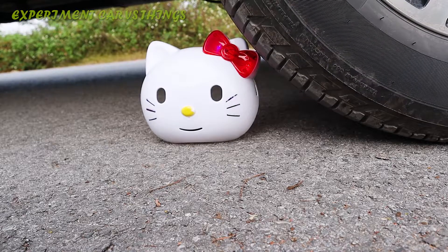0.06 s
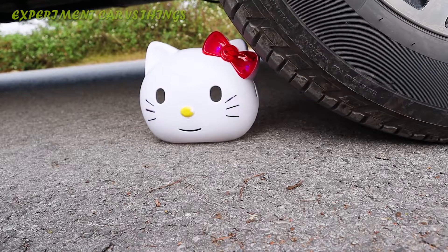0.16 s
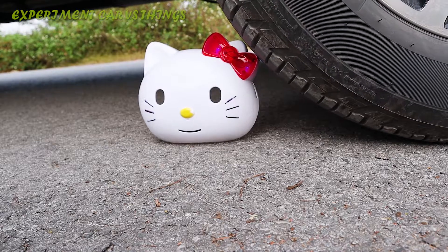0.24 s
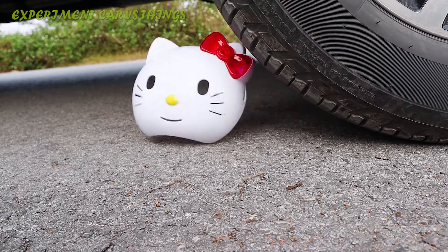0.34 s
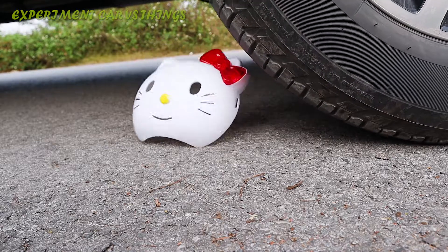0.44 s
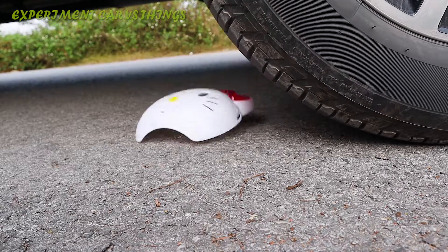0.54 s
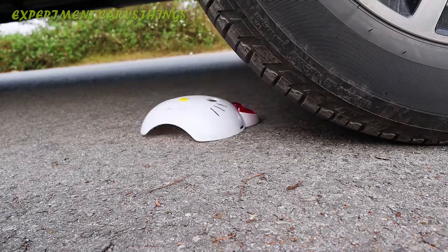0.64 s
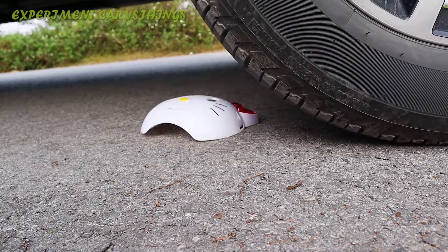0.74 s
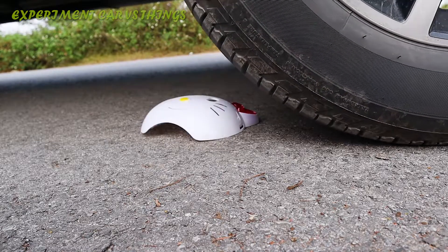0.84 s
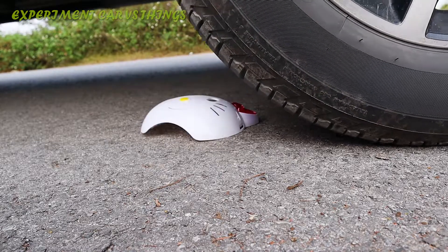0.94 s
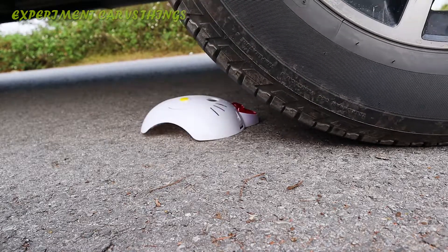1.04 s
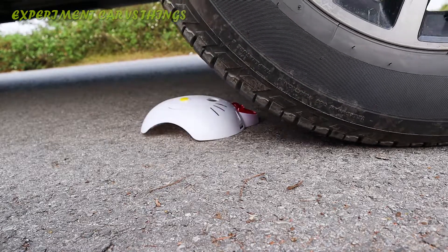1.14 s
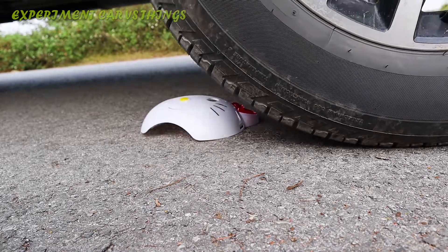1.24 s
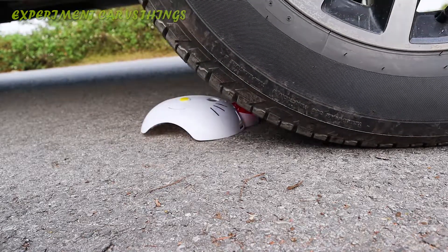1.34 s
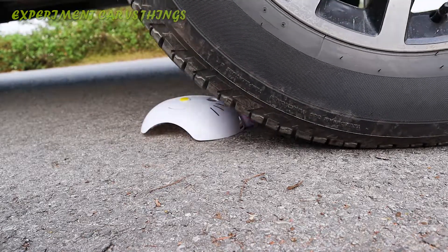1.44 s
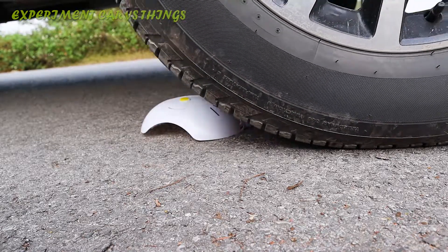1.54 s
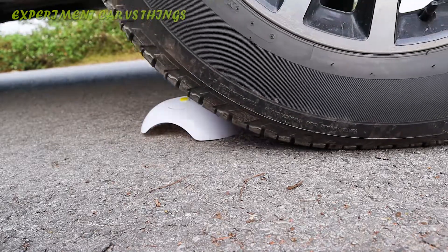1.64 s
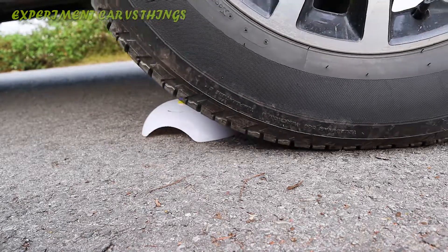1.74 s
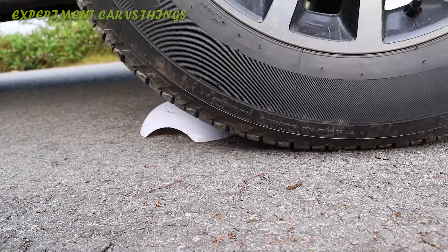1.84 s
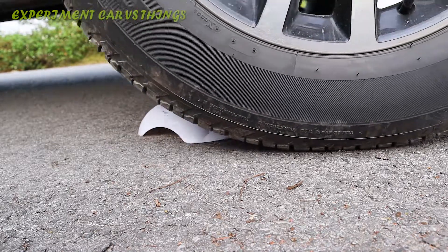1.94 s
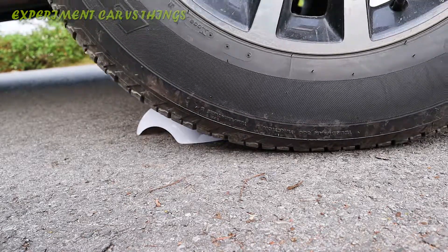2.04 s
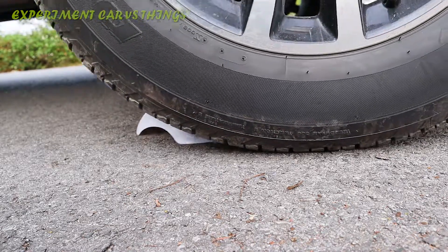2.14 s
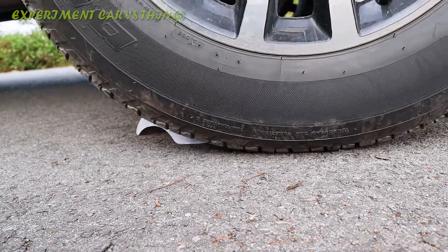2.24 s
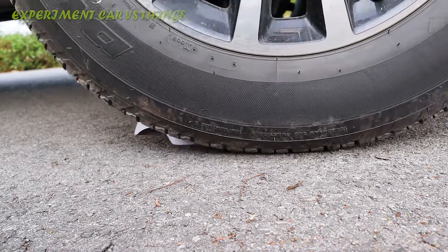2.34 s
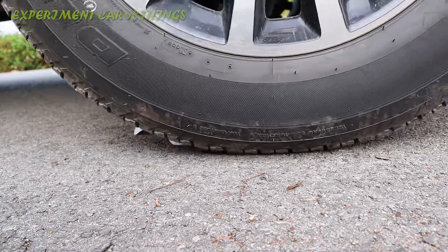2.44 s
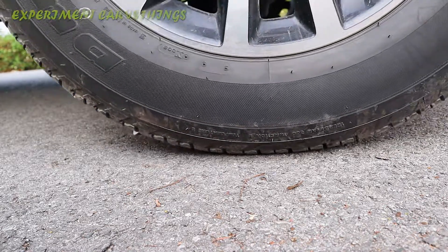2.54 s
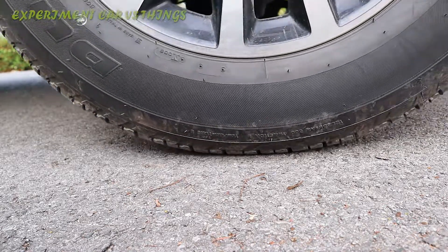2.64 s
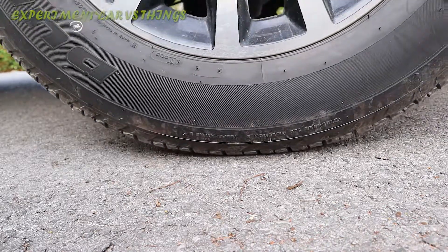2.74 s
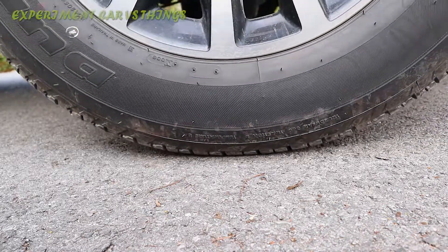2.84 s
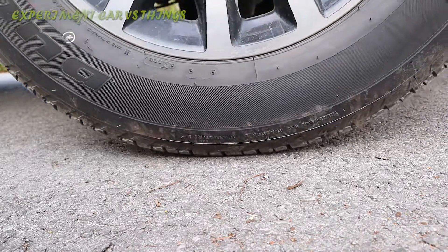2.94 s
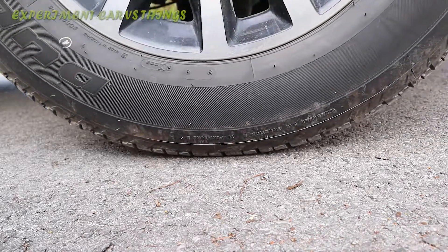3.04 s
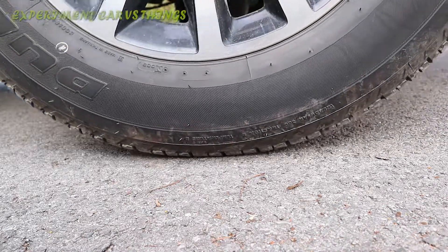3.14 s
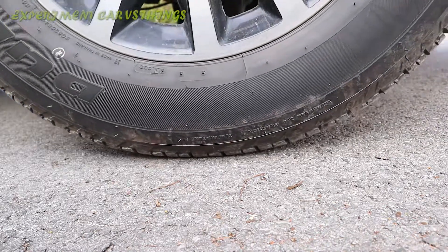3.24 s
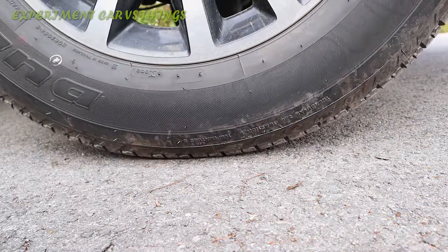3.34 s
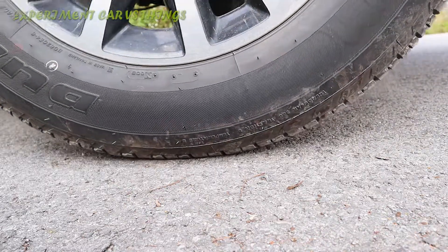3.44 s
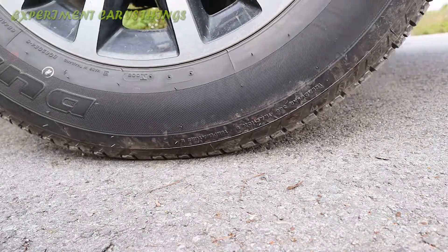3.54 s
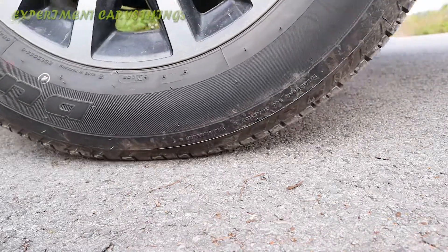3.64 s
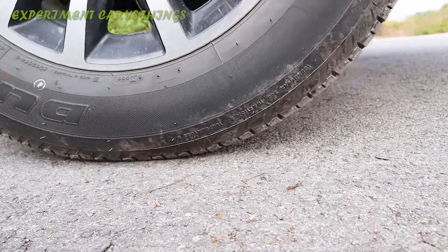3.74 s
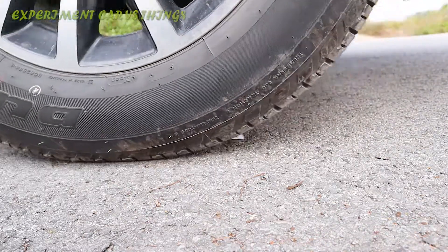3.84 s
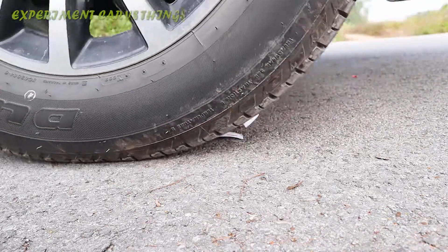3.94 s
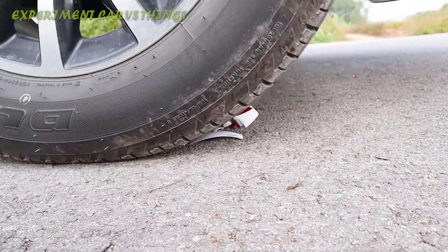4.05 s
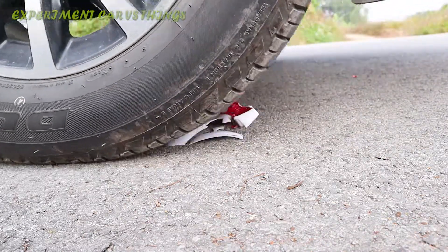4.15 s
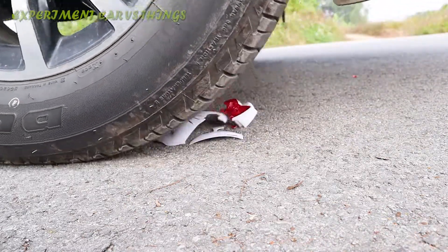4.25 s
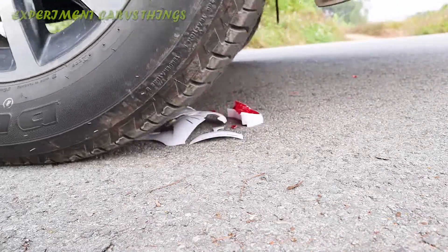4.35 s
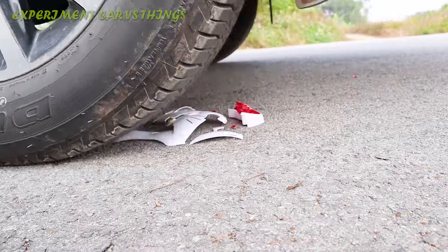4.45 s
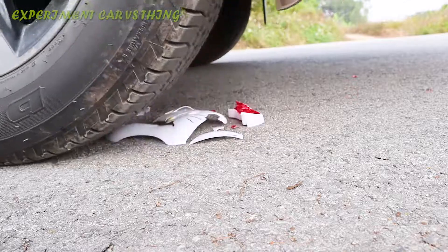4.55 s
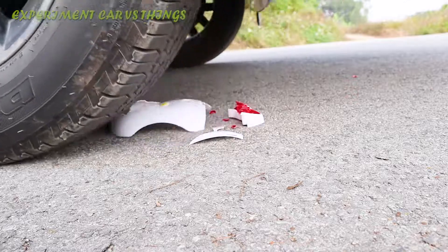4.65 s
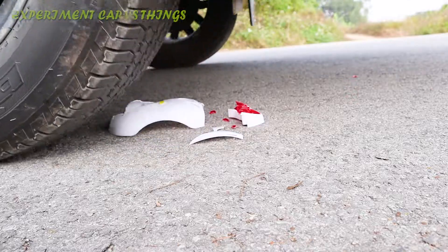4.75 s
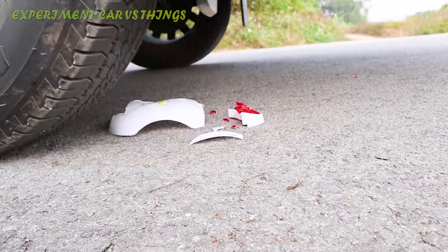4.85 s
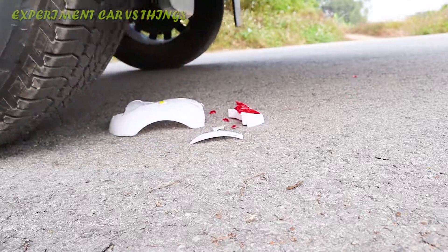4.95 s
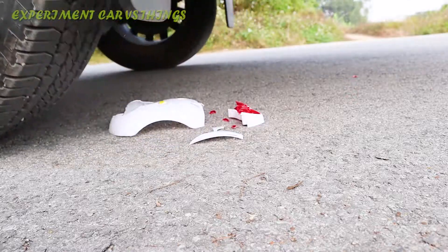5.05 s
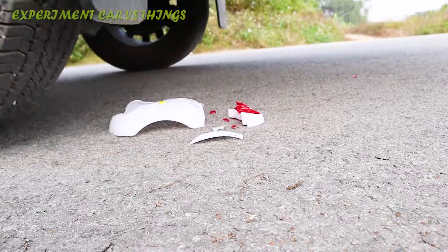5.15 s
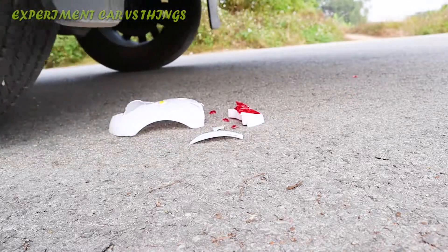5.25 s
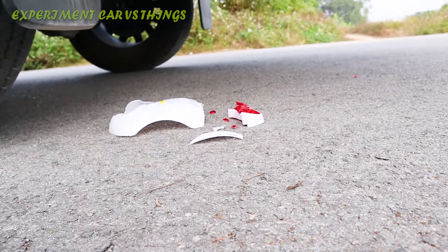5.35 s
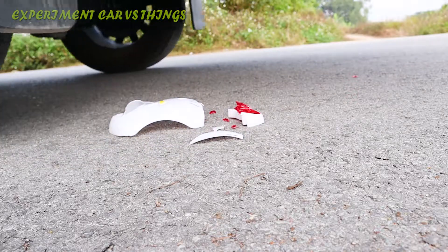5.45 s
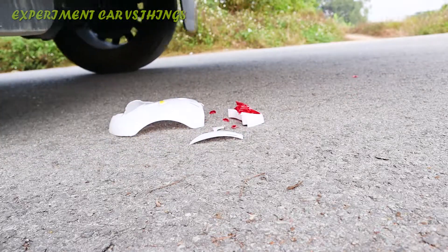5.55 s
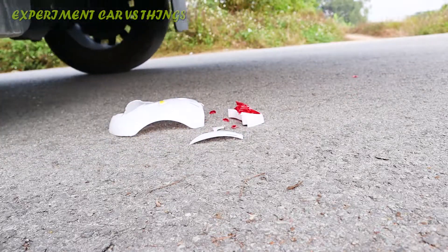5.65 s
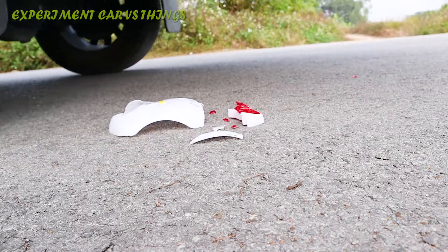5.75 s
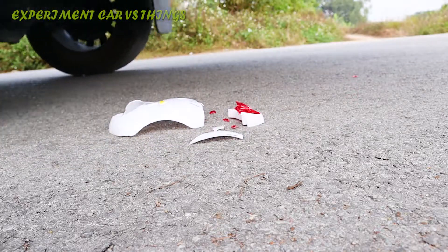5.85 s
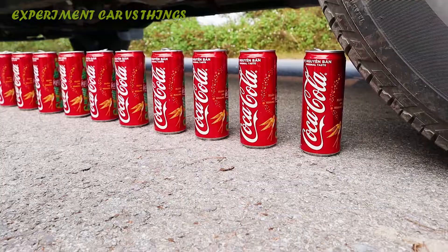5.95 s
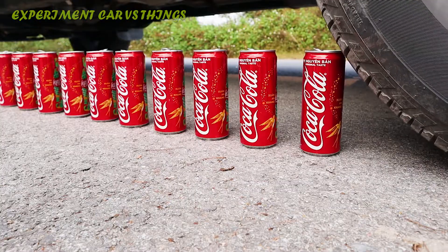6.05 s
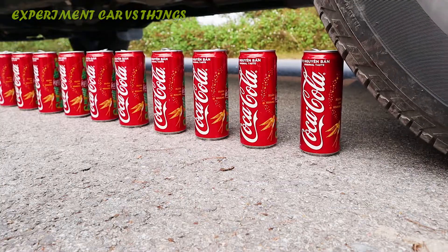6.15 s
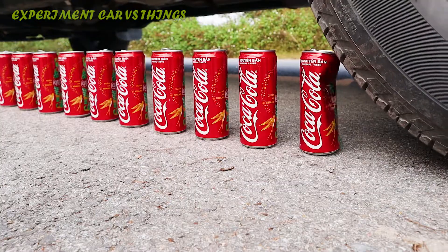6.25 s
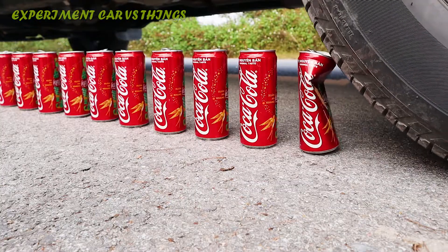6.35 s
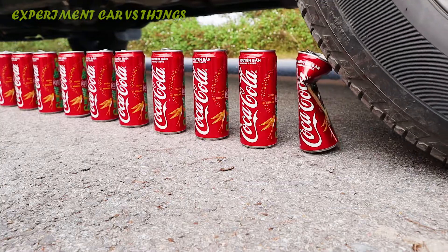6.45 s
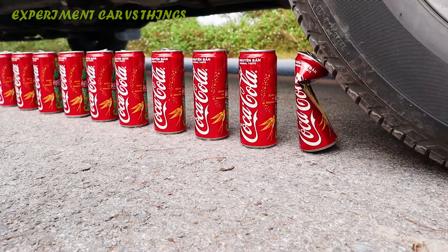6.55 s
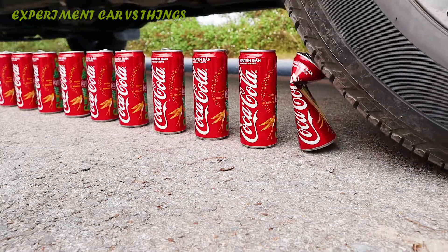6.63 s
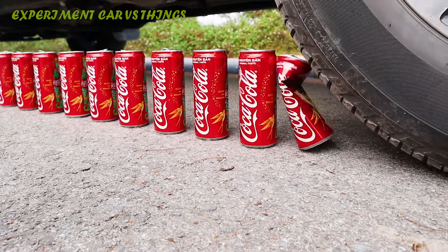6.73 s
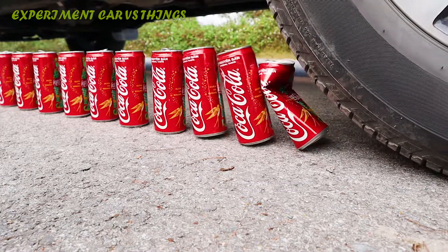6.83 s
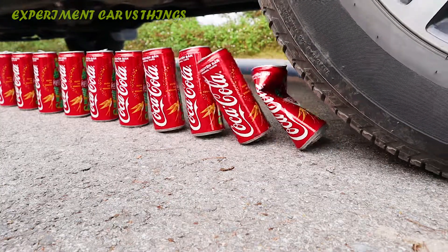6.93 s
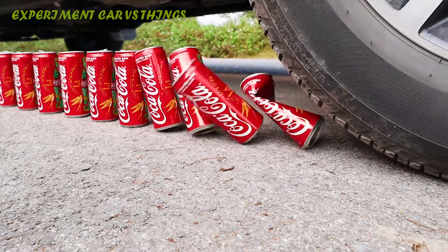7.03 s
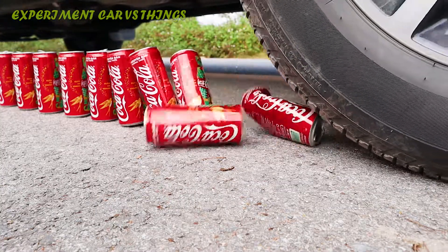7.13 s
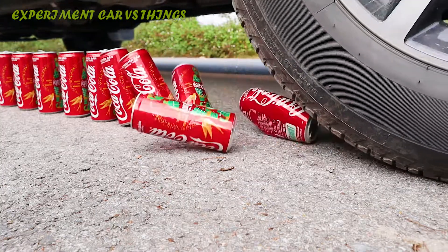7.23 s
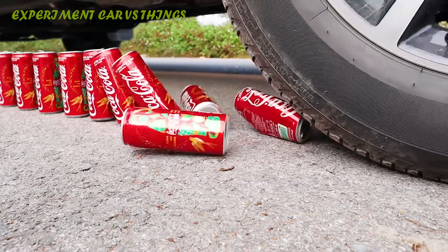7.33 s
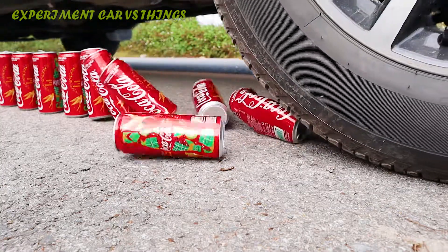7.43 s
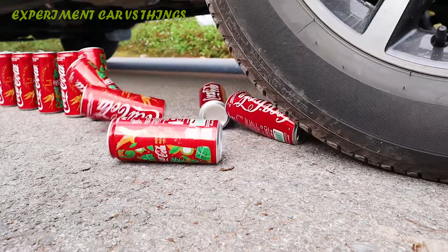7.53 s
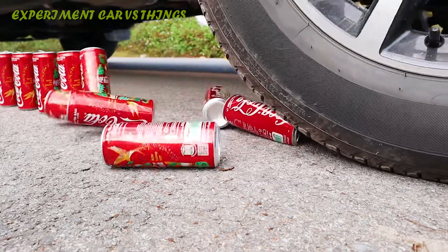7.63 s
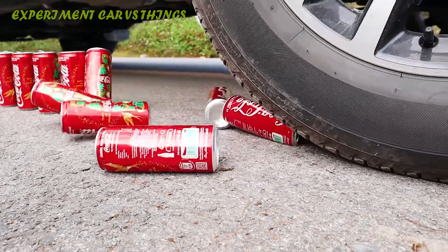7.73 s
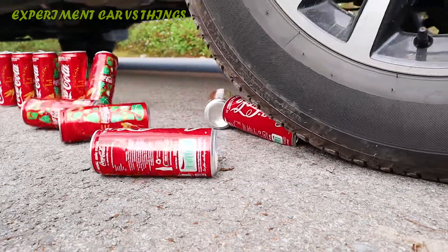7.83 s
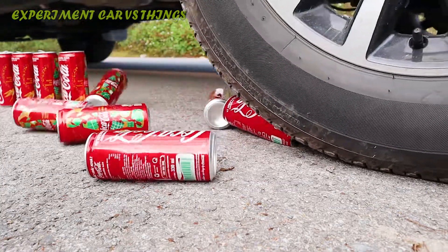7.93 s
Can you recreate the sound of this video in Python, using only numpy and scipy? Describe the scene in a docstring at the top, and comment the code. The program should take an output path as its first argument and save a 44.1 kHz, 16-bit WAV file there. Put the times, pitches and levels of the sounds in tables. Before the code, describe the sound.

Close outdoor stereo pickup on asphalt. A hollow plastic shell cracks loudly once, half of it tumbles with hollow knocks, then a pause. A tyre crushes it in a dense run of sharp, overloading cracks with gritty skids and a low tyre hum. Small pieces tick and fade. Then an empty can buckles with a pop and a row of cans clatters and rattles, over faint distant traffic.

```python
"""A car tyre creeps over a hollow plastic toy on asphalt: the shell, noise bursts ringing resonators, cracks
and skids, and a freed half tumbles and knocks. Crushed flat, it splinters into ticking pieces while jolts
set the tyre's air cavity humming, two close modes beating. Then an empty aluminium can buckles and a row of
cans topples, rattles and clinks, clicks and bursts driving wall modes. Filtered noise makes far traffic
rumble and hiss throughout; two close microphone ports pick it all up and the loudest cracks overload."""
import sys
import numpy as np
from scipy import signal
from scipy.fft import rfft, irfft
from scipy.io import wavfile

SR = 44100
rng = np.random.default_rng(int(sys.argv[2]) if len(sys.argv) > 2 else 0)


def attenuation_scalar(level_db):
    """Turn a level in dB into a linear amplitude multiplier (20 dB per decade)."""
    decades = np.asarray(level_db, float) / 20
    return 10 ** decades


def master_out(mix):
    """Clip the mix to full scale and print it as 16-bit PCM to the path in sys.argv[1]."""
    frames = np.transpose(np.atleast_2d(mix))
    ceiling = np.clip(frames, -1, 1)
    pcm = np.round(ceiling * 32767).astype(np.int16)
    wavfile.write(sys.argv[1], SR, pcm)


N = 352224   # samples

# spectrum of breaking and scraping plastic: hz, density_db (per Hz, relative)
SHELL_SPECTRUM = [(150, -11.5), (600, -4.5), (1800, -2), (3500, -3.5), (6000, -15), (11500, -19),
                  (15500, -36)]
# spectrum of struck and rattled cans: hz, density_db (per Hz, relative)
CAN_SPECTRUM = [(60, -34), (250, -16.5), (480, -4), (1000, -2), (2300, -2.5), (4000, -3.5), (7000, -7.5),
                (11500, -11.5), (15500, -33)]
FLATTENED_S = 1.8        # the shell is flat from here on
UNFLATTENED_DB = -11.5   # treble of big pieces before that


def rms_one(x):
    """Normalisation of mean power: scales to rms 1."""
    return x / np.sqrt(np.mean(x ** 2) + 1e-20)


def in_time(rows):
    """Linear interpolation: each curve column at every sample."""
    s, *columns = np.transpose(rows)
    return [np.interp(np.arange(N) / SR, s, column) for column in columns]


def at_hz(points, hz):
    """A spectrum interpolated on a logarithmic frequency axis."""
    point_hz, point_db = np.transpose(points)
    return np.interp(np.log(hz + 1), np.log(point_hz + 1), point_db)


def coloured(x, spectrum):
    """Minimum-phase filtering: folding the cepstrum makes a causal kernel, here of unit energy."""
    magnitude = attenuation_scalar(at_hz(spectrum, np.linspace(0, SR / 2, 2049)))
    cepstrum = irfft(np.log(magnitude))
    cepstrum[1:2048] *= 2
    cepstrum[2049:] = 0
    kernel = irfft(np.exp(rfft(cepstrum)))[None]
    kernel = kernel / np.linalg.norm(kernel)
    return signal.oaconvolve(x, kernel, axes=1)[:, :x.shape[1]]


def butter(x, hz, kind):
    """Maximally flat passband: a Butterworth filter designed at order 2."""
    return signal.sosfilt(signal.butter(2, hz, kind, fs=SR, output="sos"), x)


def ring(x, hz, t60):
    """Damped resonance: a unit click starts a decaying sine of initial height 1."""
    radius = attenuation_scalar(-60 / (t60 * SR))
    angle = 2 * np.pi * hz / SR
    poles = [1, -2 * radius * np.cos(angle), radius * radius]
    return signal.lfilter([0, np.sin(angle)], poles, x + 1e-18)


def grains(per_s, spread_db, clump_db):
    """Clumped random impulses: uneven clicks at a wavering rate, unrelated in sign and size in two channels."""
    clumps = np.repeat(attenuation_scalar(clump_db * rng.standard_normal(N // 512 + 1)), 512)[:N]
    born = rng.random(N) < per_s * clumps / SR
    sizes = attenuation_scalar(spread_db * np.minimum(rng.exponential(1, N), 4))
    return rms_one(born * sizes * rng.standard_normal((2, N)))


def burst(t60, treble_db, spectrum, tail_db, tail_t60, snap_db):
    """Brittle fracture: a snap, a lumpy spray, stray after-cracks and a scatter of nearby echoes."""
    t = np.arange(SR // 3) / SR
    lumps = np.repeat(attenuation_scalar(3.4 * rng.standard_normal(len(t) // 64 + 1)), 64)[:len(t)]
    spray = lumps * attenuation_scalar(-60 * t / t60)
    snap = attenuation_scalar(snap_db - 60 * t / 0.0031)
    echoes = attenuation_scalar(tail_db - 60 * t / tail_t60)
    births = (rng.random(len(t)) < 70 / SR) * rng.exponential(1, len(t))
    stray = signal.lfilter([1], [1, -attenuation_scalar(-60 / (0.014 * SR))], births)
    stray = stray * attenuation_scalar(tail_db + 5 - 60 * t / tail_t60)
    envelope = spray + snap + echoes + stray
    x = coloured(envelope * rng.standard_normal((2, len(t))), spectrum)
    low = butter(x, 4800, "low")
    return low + attenuation_scalar(treble_db - 60 * t / 4.4) * (x - low)   # the treble dies a little sooner


def add(out, x, s, peak_db):
    """Superposition: adds a sound at its time, its first channel scaled to the given peak."""
    i = round(s * SR)
    out[:, i:i + x.shape[1]] += (attenuation_scalar(peak_db) * x / np.abs(x[0]).max())[:, :N - i]


def shell():
    """Fracture exciting resonance: each crack frees a piece that rings a few cycles at its own pitch."""
    # shell cracks: start_s, peak_db, pitch_hz
    cracks = [(0.25, -30.5, 1110), (0.485, -18, 610), (0.503, -19.5, 1830), (0.74, 1.5, 3250),
              (1.78, -21, 860), (1.816, -4.5, 1080), (1.823, -0.5, 2680), (1.934, -2.5, 677),
              (1.941, -0.5, 1870), (1.968, 6, 1960), (2.056, 0.5, 2630), (2.071, 8.5, 1860),
              (2.117, -13.5, 606), (2.162, 0, 1730), (2.187, 2, 2500), (2.258, -3, 3655), (2.314, -7, 1578),
              (2.322, 0.5, 930), (2.373, 6.5, 2740), (2.415, -4, 2233), (2.443, -7.5, 2500),
              (2.492, 2, 2140), (2.551, 0.5, 1720), (2.603, -5, 2290), (2.639, -16.5, 950),
              (2.747, 4.5, 2390), (2.756, -5, 874), (2.932, -22, 4820), (3.122, -3.5, 1560),
              (3.17, 2, 3910), (3.243, -10.5, 846), (3.403, 8.5, 1618), (3.504, -21, 1180),
              (3.654, 2, 4340), (3.685, 6.5, 2920), (3.928, -16, 5125), (3.969, -12.5, 1400),
              (3.993, -10, 3240), (4.28, -20.5, 3750), (4.342, 5, 2840), (4.439, -22.5, 3400),
              (4.724, -17.5, 1450), (4.775, -21.5, 990)]
    cycles = 14.0   # of the lower mode, for both modes to decay by 60 dB
    out = np.zeros((2, N))
    for s, db, hz in cracks:
        # small pieces ring high, crack bright and break fastest; big ones are duller before flattening
        treble_db = 2 + 5.5 * np.log2(hz / 1500) + UNFLATTENED_DB * (s < FLATTENED_S)
        base_t60 = 0.07 if s > FLATTENED_S or hz < 2800 else 0.02
        x = burst(base_t60 * (hz / 1500) ** -.25, treble_db, SHELL_SPECTRUM,
                  tail_db=-17.5, tail_t60=0.24, snap_db=13)
        # the piece is soon pinned by the tread
        early = x * attenuation_scalar(-60 * np.arange(x.shape[1]) / SR / 0.086)
        upper_hz = hz * rng.uniform(1.2, 2.6)
        lower = rms_one(ring(early, hz, cycles / hz))
        upper = rms_one(ring(early, upper_hz, cycles / hz))
        rings = lower + attenuation_scalar(-3.0) * upper
        add(out, x + attenuation_scalar(-1.5) * np.std(x) * rings, s, db)
    return out


def grind():
    """Friction as dense small fractures: each skid swells, holds and fades, and the pieces ring a little."""
    # the shell or its pieces skid on asphalt: start_s (of the hold), length_s, level_db, fade_in_s, fade_out_s
    skids = [(0.407, 0.012, -22, 0.017, 0.057), (2.072, 0.52, -42.5, 0.11, 0.22),
             (3.441, 0.078, -37.5, 0.098, 0.29), (3.972, 0.023, -46.5, 0.12, 0.19),
             (4.695, 0.027, -28.5, 0.073, 0.14)]
    fade_db = 40
    t = np.arange(N) / SR
    level = np.zeros(N)
    for s, length, db, rise, fall in skids:
        corners_s = [s - rise, s, s + length, s + length + fall]
        level += attenuation_scalar(np.interp(t, corners_s, [db - fade_db, db, db, db - fade_db], -200, -200))
    grit = rms_one(coloured(grains(6500, spread_db=3.5, clump_db=5.0), SHELL_SPECTRUM))
    grit = butter(grit, 410, "high")
    pieces = np.zeros((2, N))
    for hz in np.geomspace(800, 4200, num=8):
        uneven = np.repeat(attenuation_scalar(13.0 * rng.standard_normal(N // 700 + 1)), 700)[:N]
        pieces += ring(grit * uneven, hz, 1.9 / hz)
    return level * rms_one(grit + attenuation_scalar(1.0) * rms_one(pieces))


def knocks():
    """Impact exciting dome modes: the freed half shell tumbles and knocks hollow on asphalt."""
    # knocks of the half shell: start_s, peak_db
    falls = [(0.579, -12.5), (0.657, -7.5), (0.667, -9), (0.675, -0.5), (0.684, 3), (0.692, -11),
             (0.705, -12.5), (0.758, -6.5), (0.771, -14.5), (0.781, -21), (0.798, -14), (0.807, -21.5),
             (0.822, -30.5)]
    # modes of the half shell: nominal_hz, relative_db, t60_s
    dome_modes = [(933, 3, 0.026), (2080, -6.5, 0.017)]
    sag_per_s = 0.39   # the ring sinks by this fraction as it settles flat on the ground
    out = np.zeros((2, N))
    for s, db in falls:
        x = burst(0.029, UNFLATTENED_DB, SHELL_SPECTRUM, tail_db=-25, tail_t60=0.2, snap_db=4.5)
        rings = np.zeros_like(x)
        for hz, mode_db, t60 in dome_modes:
            # each mode is a little shifted by how the half shell lies
            shift = rng.normal(1 - sag_per_s * (s - falls[0][0]), .05)
            rings += attenuation_scalar(mode_db) * rms_one(ring(x, hz * shift, t60))
        add(out, butter(x + np.std(x) * rings, 350, "high"), s, db)
    return out


def splinters():
    """Small-body resonance: each tick is a short bright break with a random pitch of its own."""
    # loose splinters tick on asphalt: start_s, peak_db
    ticks = [(2.288, -20.5), (2.483, -22), (3.272, -20), (3.8281, -31.5), (3.8639, -30), (3.891, -29),
             (3.9478, -17.5), (4.0232, -26), (4.0574, -35), (4.1403, -38.5), (4.311, -25), (4.4884, -43),
             (4.5328, -38.5), (4.545, -44), (4.645, -37.5), (4.6655, -35.5), (4.8097, -35), (4.829, -34.5),
             (4.9087, -38)]
    out = np.zeros((2, N))
    for s, db in ticks:
        x = burst(0.071, 1.5, SHELL_SPECTRUM, tail_db=-13.0, tail_t60=0.14, snap_db=10.0)
        x = butter(x, 590, "high")
        hz = rng.uniform(1500, 7000)
        rings = rms_one(ring(x, hz, 24.0 / hz))
        add(out, x + attenuation_scalar(-9.5) * np.std(x) * rings, s, db)
    return out


def thumps():
    """Cavity resonance and beating: thumps push low, shake the carcass, hum in the tyre's air and ring its rim."""
    # low thumps, of the loaded tyre and last of the cans: start_s, push_impulse_db, hum_impulse_db
    low_thumps = [(1.936, -28, -35), (2.073, -9.5, -57.5), (3.405, -25.5, -40), (3.687, -30.5, -36.5),
                  (7.913, -9, -93)]
    cavity_hz, split_hz, cavity_t60 = 197.7, 2.5, 3.1   # under load the mode splits in two and beats
    at, push_db, hum_db = np.transpose(low_thumps)
    i = np.round(at * SR).astype(int)
    push, hum = np.zeros((2, N))
    push[i] = attenuation_scalar(push_db)
    hum[i] = attenuation_scalar(hum_db)   # next to none for the cans
    shake = signal.lfilter([1], [1, -attenuation_scalar(-60 / (.3 * SR))], hum)
    carcass = attenuation_scalar(12.0) * shake * rms_one(butter(rng.standard_normal(N), [110, 480], "band"))
    rim = attenuation_scalar(2.5) * (ring(hum, hz=578, t60=0.16) + ring(hum, hz=844, t60=0.49))
    cavity = ring(hum, cavity_hz, cavity_t60)
    cavity = cavity + attenuation_scalar(-14.5) * ring(hum, cavity_hz - split_hz, cavity_t60)
    thud = ring(push, hz=80.0, t60=0.018)
    return (thud + carcass + cavity + rim) * [[1], [.6]]


def can_hits():
    """Impact and snap-through buckling: blows on the cans, hollow tonks of popping walls, clinking rims."""
    # blows on the cans: start_s, peak_db
    blows = [(6.315, -1), (6.347, -15.5), (6.388, -6.5), (6.824, -6.5), (7.117, -14.5), (7.231, 2),
             (7.328, -10.5), (7.389, -5), (7.544, -12), (7.553, -5), (7.585, 1), (7.66, -11.5),
             (7.688, -8.5), (7.732, -7), (7.789, -11.5), (7.84, -6.5), (7.895, -4.5), (7.907, 2)]
    # a can wall pops in or out: start_s, peak_db, pitch_hz
    pops = [(6.3079, -5, 568), (7.865, -12, 478)]
    # rims clink as the cans lean and slide on one another: start_s, peak_db
    clinks = [(6.875, -22.5), (6.921, -20), (6.943, -22.5), (7.284, -18.5), (7.372, -18.5), (7.967, -17.5)]
    hits = np.zeros((2, N))
    for s, db in blows:
        # wall blows are dull; once the cans lie, rim meets rim, brighter
        t60, treble_db = (0.05, 1.5) if s > 7.5 else (0.12, -8.5)
        add(hits, burst(t60, treble_db, CAN_SPECTRUM, tail_db=-19.5, tail_t60=0.21, snap_db=3), s, db)
    buckle = np.eye(1, 4410) * [[1], [.2]]   # a single click
    for s, db, hz in pops:
        add(hits, ring(butter(buckle, 1700, "low"), hz, t60=0.032), s, db)
    for s, db in clinks:
        x = burst(0.15, 2.2, CAN_SPECTRUM, tail_db=-12.5, tail_t60=0.21, snap_db=8.5)
        add(hits, butter(x, 2800, "high"), s, db)
    return hits


def can_rattle():
    """Repeated random contact: cans roll dully on asphalt, and harder rattling of their rims is brighter."""
    # drive of the rattle: time_s, drive_db (ahead of the can balance)
    rattling = [(6.12, -68.5), (6.15, -60), (6.22, -73), (6.56, -59.5), (6.58, -47), (6.66, -71),
                (6.8, -46), (6.83, -18), (6.92, -29), (7.135, -24.5), (7.155, -20), (7.27, -19.5),
                (7.35, -24.5), (7.44, -19.5), (7.62, -30), (7.99, -25)]
    drive_db, = in_time(rattling)
    contacts = butter(grains(3500, spread_db=2.0, clump_db=3.0), 5400, "low")
    rattle = rms_one(coloured(contacts, CAN_SPECTRUM))
    dull = butter(rattle, 2900, "low")
    treble_db = -7 + 1.2 * (drive_db + 24.5)
    return attenuation_scalar(drive_db) * (dull + attenuation_scalar(treble_db) * (rattle - dull))


def can_walls(strikes):
    """Modal superposition: five cans a little out of tune share the contacts unevenly."""
    # can wall modes: nominal_hz, relative_db, nominal_t60_s
    wall_modes = [(494, -0.5, 0.047), (692, -8, 0.06), (850.4, -10, 0.14), (1043, -11, 0.24),
                  (1195, -7, 0.078), (1673, -9, 0.13), (1982, -10, 0.1), (2288, -1, 0.09)]
    # dense upper modes of dented walls: from_hz, to_hz, relative_db, nominal_t60_s
    dense_modes = (2701, 5604, -8.5, 0.08)
    from_hz, to_hz, dense_db, dense_t60 = dense_modes
    modes = [(*mode, .014) for mode in wall_modes]   # the last number is the spread in tuning
    modes += [(hz, dense_db, dense_t60, .05) for hz in np.geomspace(from_hz, to_hz, num=6)]
    start = round(6.0 * SR)   # the walls are driven from here on
    walls = np.zeros((2, N))
    for hz, db, t60, spread in modes:
        for tune in 1 + spread * rng.standard_normal(5):
            share_db = 6.4 * np.minimum(rng.standard_normal(N // 3000 + 1), 1.8) - 10.5
            uneven = np.repeat(attenuation_scalar(share_db), 3000)[start:N]
            walls[:, start:] += attenuation_scalar(db) * ring(uneven * strikes[:, start:], hz * tune, t60 * tune)
    return walls


def cans():
    """Source and resonator: blows and rattle are heard directly and also drive the can walls."""
    hits = can_hits()
    rattle = can_rattle()
    walls = can_walls(rattle + attenuation_scalar(-14.0) * hits)   # hard blows dent the wall and ring it less
    return hits + attenuation_scalar(-2.5) * rattle + attenuation_scalar(-34.5) * walls


def traffic():
    """Band-limited noise: a low rumble and a smooth far hiss, their levels drifting slowly."""
    # background level, sinking and rising slowly: time_s, rumble_db (rms), hiss_db (rms within 250-700 Hz)
    background = [(0, -48.5, -60.5), (4.9, -61, -66.5), (6.2, -51.5, -60), (7.99, -55, -56.5)]
    # spectrum of the hiss: hz, density_db (per Hz, relative)
    hiss_spectrum = [(59, -35.5), (100, -2.5), (215, -7), (462, -12), (1080, -22), (2970, -31.5),
                     (11600, -46)]
    rumble_db, hiss_db = in_time(background)
    rumble = butter(rng.standard_normal((2, N)), [38, 70], "band")
    rumble = rms_one(butter(rumble, 120, "low"))
    hiss = coloured(rng.standard_normal((2, N)), hiss_spectrum)
    hiss /= np.std(butter(hiss, [250, 700], "band"))
    return attenuation_scalar(rumble_db) * rumble + attenuation_scalar(hiss_db) * hiss * [[1], [2.5]]


def ports(x, pan, alike, side_db):
    """Partial coherence of close ports: they differ by a quarter-cycle-shifted copy and an unrelated part."""
    # difference of the ports, growing with pitch: hz, side_over_mid_db (before each source's offset)
    side_gain = [(110, -21.5), (240, -20), (950, -6.5), (3770, 2), (15000, 8)]
    mid, other = rfft(x)
    gain = attenuation_scalar(side_db + at_hz(side_gain, np.linspace(0, SR / 2, len(mid))))
    shifted = 1j * alike * mid
    unrelated = np.sqrt(1 - alike ** 2) * other
    side = irfft(gain * (shifted + unrelated), N) + pan * x[0]
    return np.array([x[0] + side, x[0] - side])


def scene():
    """Superposition of sources: toy and thumps near the middle, the cans a little to the right."""
    toy_and_thumps = shell() + grind() + knocks() + splinters() + thumps()
    near = ports(toy_and_thumps, pan=-0.033, alike=0.14, side_db=-2.5)
    right = ports(cans(), pan=-0.13, alike=-0.061, side_db=-4.5)
    far = ports(traffic(), pan=0, alike=.3, side_db=-2.0)
    return near + right + far


def low_pass(x):
    """Removes everything above the highest recorded frequency."""
    return signal.sosfilt(signal.butter(12, 15640, fs=SR, output="sos"), x)


def record(dry):
    """Overload by hard clipping: the loudest cracks hit the ceiling."""
    mix = np.clip(dry, -1, 1)
    return low_pass(mix)


dry = scene()
out = record(dry)
master_out(out)
```